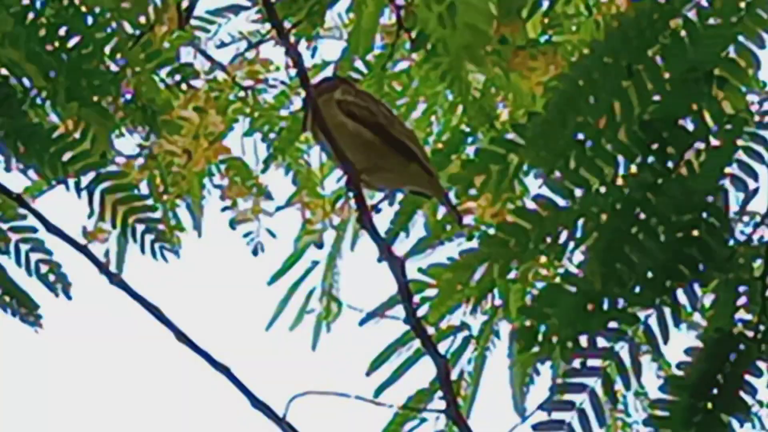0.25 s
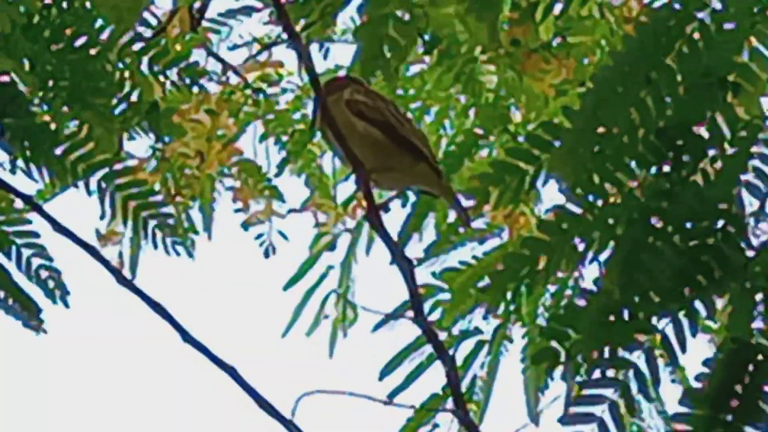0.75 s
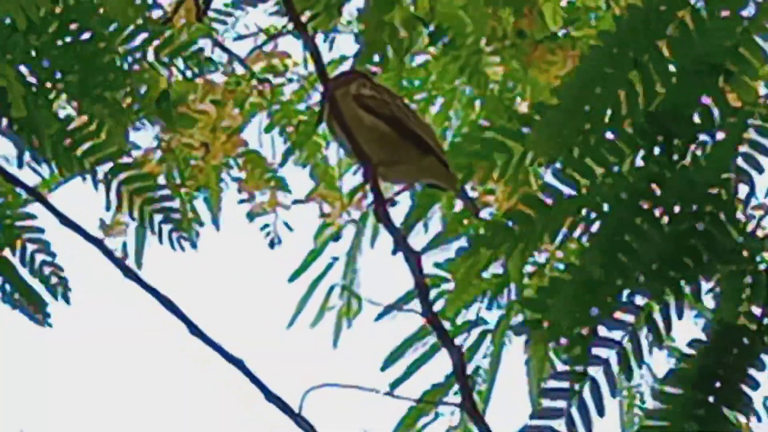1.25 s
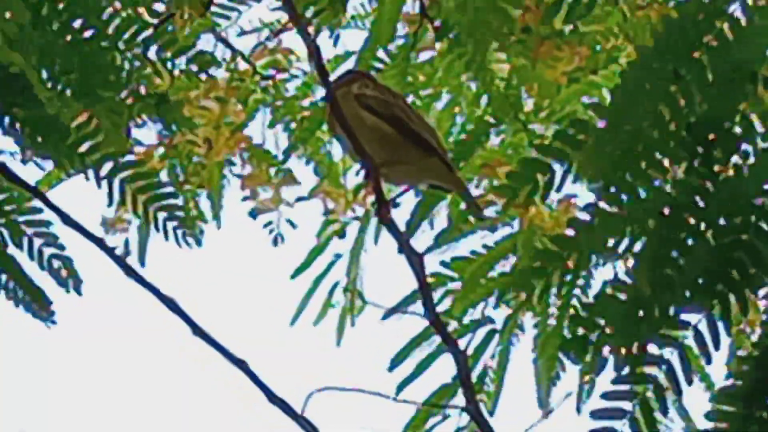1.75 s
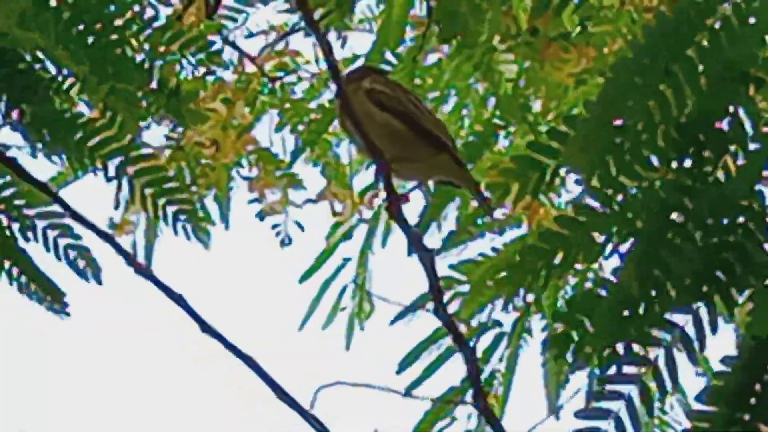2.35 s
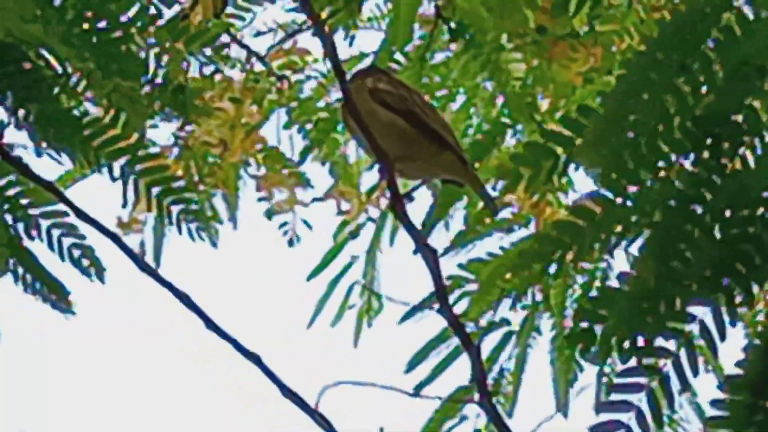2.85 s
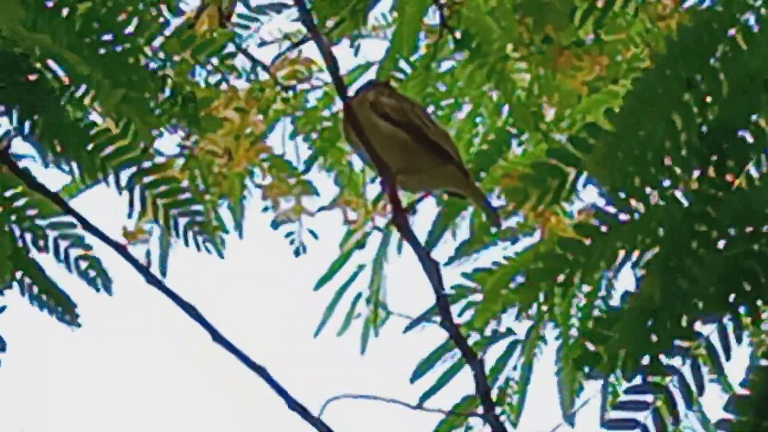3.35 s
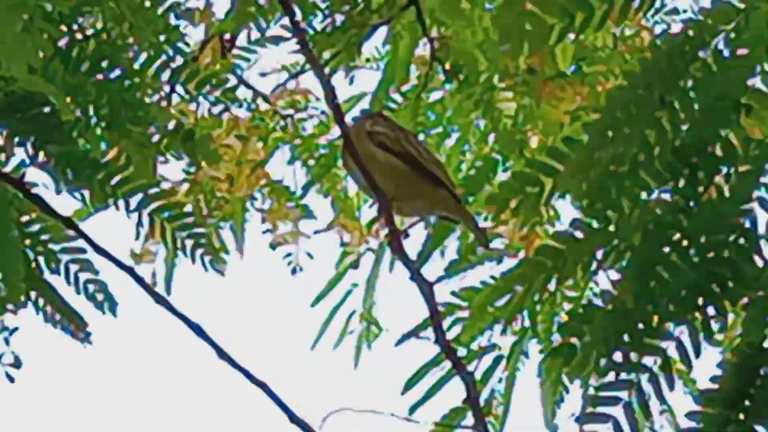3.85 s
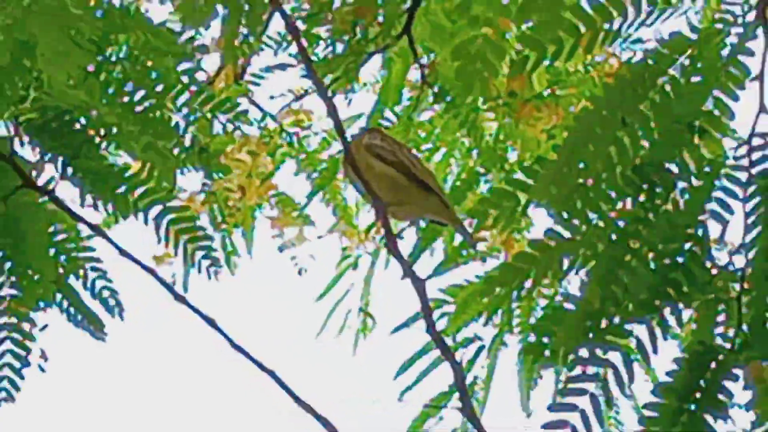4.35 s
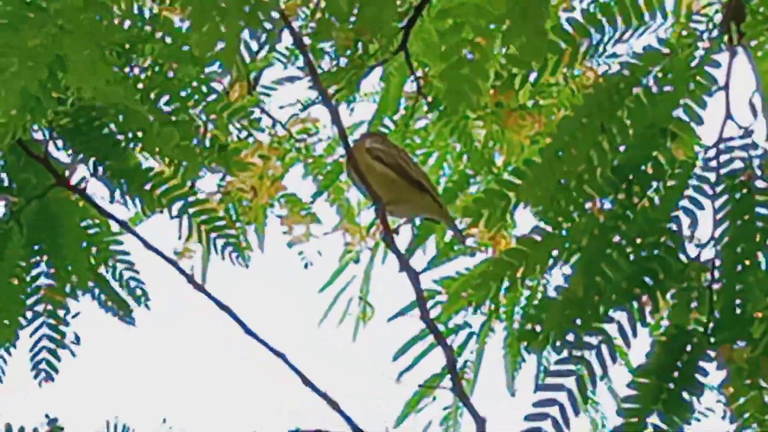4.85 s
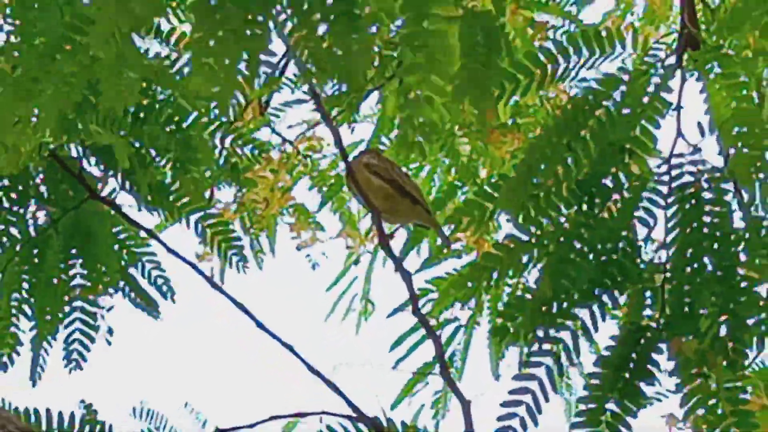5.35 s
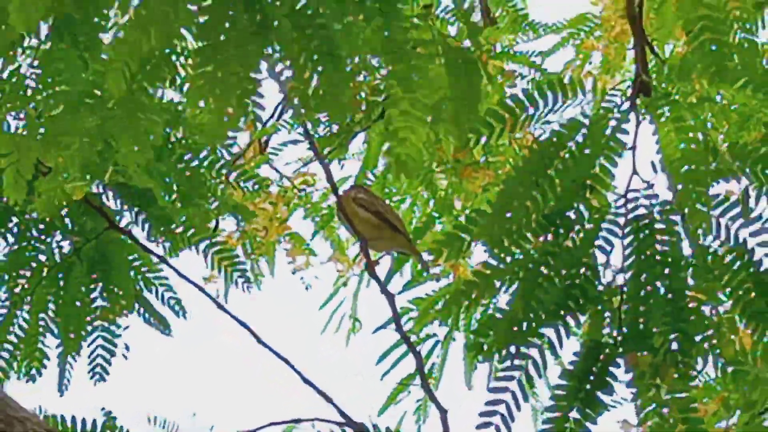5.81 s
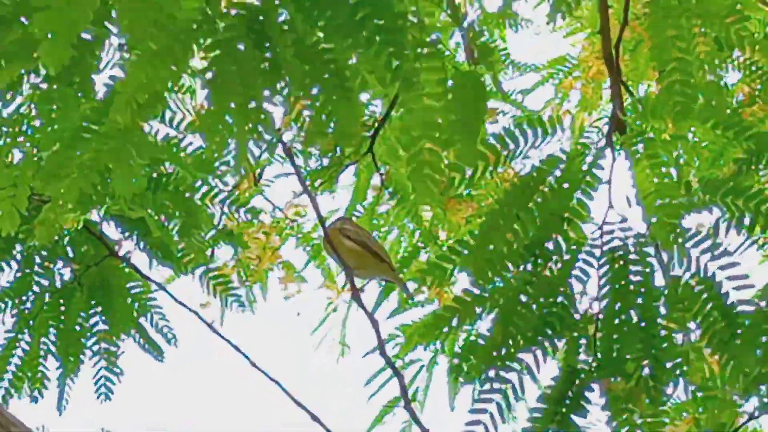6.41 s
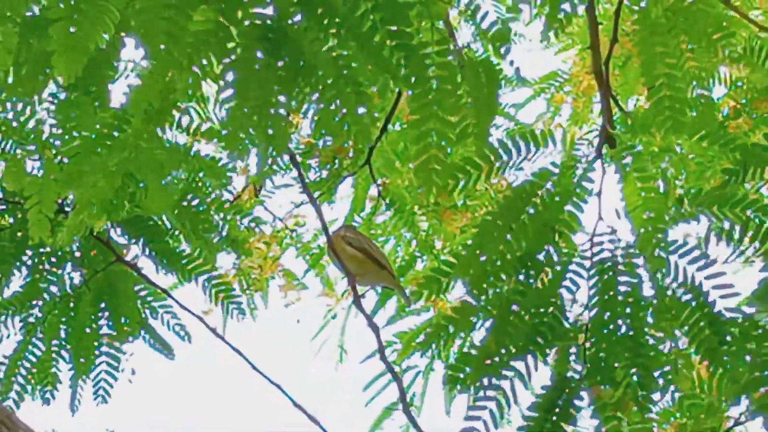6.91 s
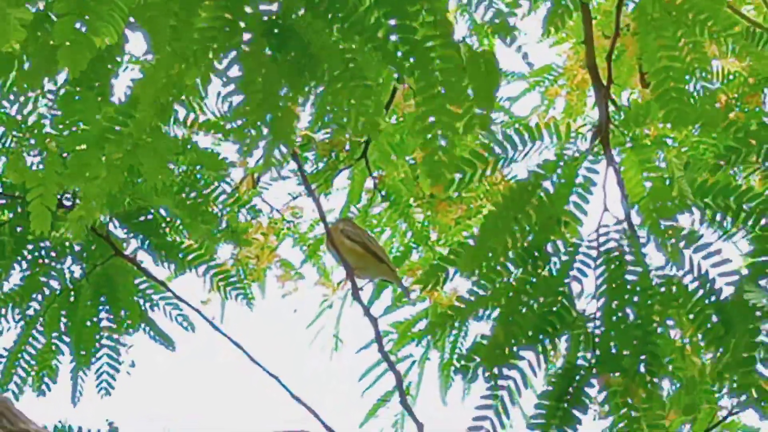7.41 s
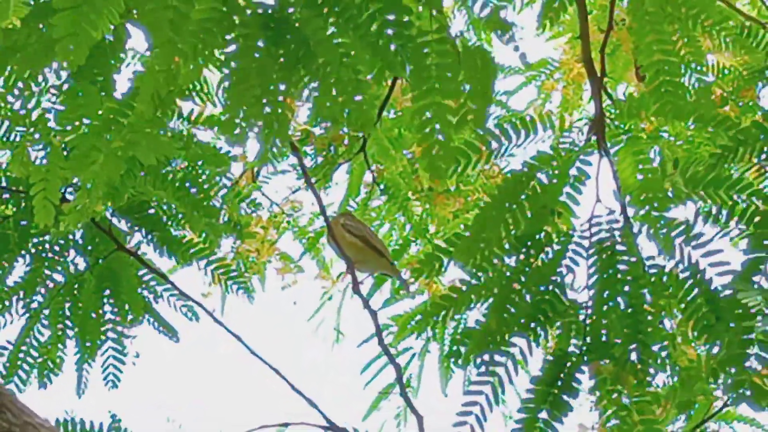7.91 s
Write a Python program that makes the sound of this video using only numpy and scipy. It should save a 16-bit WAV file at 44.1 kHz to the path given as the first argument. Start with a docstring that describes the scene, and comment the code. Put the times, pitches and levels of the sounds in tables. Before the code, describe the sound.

Small birds in a leafy tree give quick, sliding whistles, mostly to the right, with raspy scolding and a blurred flock behind. A cicada buzzes brightly, swelling and then falling away. Calling is busiest early, nearly stops around the middle, and returns as lighter chirps and clearer whistles. Far traffic, soft hiss, a distant dove and small wind bumps surround them. The outdoor stereo microphone is near the birds.

```python
"""A leafy tree: small birds whistle, twitter and scold, mostly to the right, over a cicada and a faint cricket.
Whistles are gliding sines with weak overtones; scolding is throbbing noise; the far flock is many short chirps.
The cicada is a train of clicks, strong and weak in turn, through changing crackles; the cricket is short pips.
Farther off a dove coos, something calls once on a rising pitch and a hollow knock sounds, all built from sines.
Filtered noise makes the traffic rumble, gusts and hiss; the sound drops out for a moment near the start."""
import sys
import numpy as np
from scipy import signal
from scipy.fft import rfft, irfft, next_fast_len
from scipy.io import wavfile
from scipy.ndimage import uniform_filter1d, minimum_filter1d

SR = 44100
rng = np.random.default_rng(int(sys.argv[2]) if len(sys.argv) > 2 else 0)


def wav_record(signal):
    """Record a signal, one row per channel, as 16-bit PCM in the file named by sys.argv[1]."""
    frames = np.transpose(np.atleast_2d(signal))
    bounded = np.clip(frames, -1, 1)
    # unit amplitude maps onto the largest positive 16-bit level
    quanta = np.round(bounded * 32767).astype(np.int16)
    wavfile.write(sys.argv[1], SR, quanta)


N = 360297
LEFT_LAG = 9  # delay of the left port [samples]

# A bare sine: (multiple of the pitch, level [dB])
PURE_TONE = [(1, 0)]


def amp(db):
    """Amplitude factor of a level in dB."""
    return 10 ** (np.asarray(db) / 20)


def rms_one(x):
    """Scale to an overall RMS of 1."""
    return x / np.sqrt(np.mean(x ** 2) + 1e-20)


def in_time(rows):
    """Draw each column of a table as a curve over the whole scene."""
    s, *columns = np.transpose(rows)
    return [np.interp(np.arange(N) / SR, s, column) for column in columns]


def at_hz(points, hz):
    """Read a frequency curve, with straight lines on a log frequency axis."""
    p = np.array(points)
    return np.interp(np.log(hz + 1), np.log(p[:, 0] + 1), p[:, 1])


def colour(x, gain):
    """Filter by a gain per frequency, without shifting phase."""
    size = next_fast_len(N)
    spectrum = rfft(x, size) * gain(np.fft.rfftfreq(size, 1 / SR))
    return irfft(spectrum, size)[..., :N]


def drift(rate, size=N):
    """Slow random wander of RMS 1: noise through two equal low-pass poles at rate [Hz]."""
    r, lead = np.exp(-2 * np.pi * rate / SR), int(SR / rate)
    noise = rng.standard_normal(size + lead)
    return rms_one(signal.lfilter([1], [1, -2 * r, r * r], noise)[lead:])


def place(x, pan_db):
    """Place a source: the left port hears it later, at pan_db against the right."""
    return np.array([np.roll(x, LEFT_LAG) * amp(pan_db), x])


def tail(t60, start_s):
    """A dying burst of noise for each side, energy 1."""
    t = np.arange(int(.5 * SR)) / SR
    burst = rng.standard_normal((2, len(t))) * amp(-60 * t / t60) * (t > start_s)
    return burst / np.sqrt(np.sum(burst ** 2, axis=1, keepdims=True))


def add_note(out, rows, partials, pan_db, waver=.005, flutter_db=2.6, edge_s=.003):
    """One sung note: partials on a gliding pitch, unsteady in pitch and level, with soft ends."""
    s, hz, level_db = np.transpose(rows)
    i = np.arange(round(s[0] * SR), min(round(s[-1] * SR), N))
    pitch = np.interp(i / SR, s, hz) * (1 + waver * drift(190, len(i)))
    phase = 2 * np.pi * (np.cumsum(pitch) / SR + rng.random())
    # partials too near the top of the band stay silent
    tone = sum(amp(db) * np.sin(k * phase) * (k * pitch < .45 * SR) for k, db in partials)
    ends = np.clip(np.minimum(i - i[0], i[-1] - i) / (edge_s * SR), 0, 1)
    level = np.interp(i / SR, s, level_db) + flutter_db * drift(96, len(i))
    gain = np.sqrt(2) * amp(level)  # a sine at 0 dB has RMS 1
    out[:, i] += place(tone * gain * ends, pan_db)


def add_whistle(out, rows, pan_db, twelfth_db):
    """A slightly hoarse sine with weak overtones; the octave is weaker in higher notes."""
    mean_khz = np.mean(rows, axis=0)[1] / 1000
    octave_db = -22.5 - 2.5 * (mean_khz - 3.5)
    partials = [(1, 0), (2, octave_db), (3, twelfth_db)]
    add_note(out, rows, partials, pan_db, waver=0.0055, flutter_db=3)


def near_whistles():
    """Each near whistle glides along a bowed line, swells to its loudest moment and fades."""
    # Whistled notes: (time [s], length [s], first pitch [Hz], last pitch [Hz],
    # bow of the glide at half length [Hz], loudest moment [share of length],
    # level there before flutter [dB], left minus right before crown and shade [dB])
    notes = [(0.0, 0.059, 3350, 2800, -130, .05, -21.5, -14),
             (0.176, 0.044, 3080, 2390, 70, .1, -28.5, -25), (0.214, .09, 3540, 2840, 52, 0.13, -22, -5),
             (0.635, .11, 3667, 2790, 144, 0.108, -20, -14),
             (1.08, 0.15, 3805, 3230, 155.5, 0.49, -18.5, -13),
             (1.258, .13, 4300, 2996, -100, 0.3, -13.5, -17),
             (1.297, 0.028, 5900, 8200, 297, .1, -19.5, -17), (1.36, .02, 8000, 11000, 0, .5, -38, -17),
             (1.732, .015, 2990, 3500, 0, 0.57, -21.5, -18), (1.923, 0.051, 3890, 3540, -2, 0.4, -20, -16),
             (1.332, 0.028, 7940, 5697, -800, 0.7, -16, -14),
             (1.372, 0.039, 5580, 3546, 0, 0.95, -18.5, -19),
             (1.449, 0.21, 3654, 3266, -120, 0.13, -15.5, -11),
             (1.529, 0.062, 4610, 4250, 116, 0.7, -17.5, -18),
             (1.595, 0.15, 4230, 2877, -280, 0.25, -11, -17),
             (1.75, 0.07, 4132, 3686, 79, 0.044, -11, -20.5), (1.79, .055, 5730, 5020, 77, 0.32, -22, -16),
             (1.844, 0.19, 4840, 2790, -400, 0.36, -11.5, -15),
             (2.04, 0.033, 2730, 2130, 100, .05, -40, -19), (2.163, .04, 7160, 6580, 168.5, .1, -25, -21),
             (2.181, 0.21, 4546, 2880, -330, 0.31, -10, -16),
             (2.2, 0.16, 5650, 3552, -400, 0.66, -13, -8.5), (2.37, 0.057, 3250, 2805, 4, 0.43, -22.5, -22),
             (2.506, 0.079, 4210, 4210, -300, 0.42, -13.5, -20),
             (2.575, 0.032, 4040, 2870, 150, 0.22, -13.5, -24),
             (2.808, 0.2, 4470, 2930, -19, 0.43, -12.5, -16), (3.122, .05, 3660, 3070, 0, 0.47, -18.5, -11),
             (3.28, 0.093, 3876, 3000, 33, .05, -12.5, -16),
             (3.531, 0.11, 3533, 2840, -38, 0.044, -19, -11.5),
             (3.622, .03, 7500, 7400, -100, .6, -33, -11), (3.634, 0.03, 3620, 3980, -2, 0.6, -14.5, -13),
             (3.668, 0.029, 3657, 2915, 283, 0.25, -17, -10),
             (3.697, 0.047, 3050, 2960, -5, 0.57, -32.5, -13), (3.693, 0.031, 6770, 6600, 0, .2, -25, -25),
             (3.7, 0.04, 6130, 5993, -2.5, 0.83, -17, -28),
             (3.736, .175, 4313, 2776, -64, 0.39, -14.5, -9.5), (3.974, 0.033, 2810, 2520, 0, .1, -31, -18),
             (4.04, 0.039, 2880, 2330, 58.5, .2, -31.5, -19),
             (4.957, 0.17, 6060, 5180, 593, 0.46, -17, -16),
             (4.962, 0.066, 4080, 2913, 160, .05, -24.5, -11), (5.008, .05, 8300, 4400, -180, .5, -31, -12),
             (5.066, 0.016, 3140, 2990, 250, 0.3, -34.5, -16),
             (5.142, 0.031, 3300, 2810, 202, 0.45, -29.5, -16),
             (5.188, 0.034, 3230, 3500, 50, .5, -32.5, -10), (5.193, 0.023, 7400, 7560, 800, .3, -39, -7),
             (5.203, .05, 5780, 4005, 130, .5, -31, -10), (5.23, 0.02, 3090, 2700, 0, .1, -38, 4.5),
             (5.255, 0.11, 8000, 8400, 550, 0.93, -37, -15), (5.344, 0.045, 8600, 7780, 600, 1, -33.5, -11),
             (5.373, 0.049, 7770, 8100, 3, .1, -32, -7), (5.293, 0.037, 6460, 6960, 850, 0.43, -29.5, -11),
             (5.325, .18, 6890, 4920, 1150, 0.74, -28, -15), (5.434, 0.16, 4650, 2890, -170, .5, -30, -6.5),
             (5.27, 0.013, 5890, 4570, 0, .5, -28, -12), (5.328, 0.017, 4750, 5140, 0, .5, -28, -10),
             (5.429, .04, 5900, 6030, 0, .2, -32, -14), (5.57, .02, 5400, 4770, 0, .4, -35, -12),
             (5.687, 0.093, 6400, 8700, 700, 0.33, -48, -6), (5.881, .02, 5100, 4170, -2, .7, -27, -12),
             (5.967, .012, 5020, 4840, 0, .5, -30, -12), (5.49, 0.015, 2920, 2800, 0, .3, -39, -17),
             (5.527, 0.024, 3220, 2232, 0, .1, -28, -19), (5.62, 0.037, 2898, 2540, 188, 0.55, -43, -20),
             (5.604, 0.072, 5920, 5890, -110, .05, -28, -15),
             (5.68, 0.14, 4300, 4180, -110, 0.73, -32.5, -4), (5.741, .015, 4834, 5100, 0, .7, -27, -12),
             (5.758, 0.023, 2980, 2710, 450, 0.95, -28.5, -14), (5.8, .03, 7590, 7530, 240, .1, -38, -15),
             (5.888, 0.019, 2890, 2710, 355, .4, -29.5, -16), (5.958, .025, 6980, 7000, 0, .3, -38, -15),
             (6.026, 0.0143, 8060, 6500, 0, .7, -41, -13), (6.04, .015, 3062, 2810, 0, 0.33, -34, -16),
             (6.134, 0.066, 4840, 4340, 250, 0.22, -27.5, -21), (6.165, .015, 3040, 2720, 0, .3, -33, -18),
             (6.336, .027, 6200, 3250, -500, 0.59, -21, -13),
             (6.35, 0.032, 4700, 4280, -77, 0.76, -20.5, -12), (6.365, .012, 3300, 4400, 5, .5, -21, -12),
             (6.377, 0.0084, 4550, 2700, 0, .3, -23, -21), (6.38, .02, 6080, 4800, 200, .3, -25, -14),
             (6.399, 0.065, 4740, 4660, -27, .1, -24.5, -3), (6.438, 0.013, 3500, 1930, 0, .1, -36, -19),
             (6.46, .025, 5000, 5260, 0, .2, -26, -8), (6.475, 0.019, 6190, 6060, 0, .8, -21, -17),
             (6.5, 0.075, 4830, 3570, -200, 0.56, -29, -2), (6.566, 0.064, 3670, 2874, 32, 0.67, -23, -10),
             (6.61, 0.026, 7060, 4400, 1100, .4, -23, -5), (6.689, .033, 7030, 4270, 1197, 0.37, -24, -12),
             (6.729, 0.053, 4170, 4500, 1500, 0.13, -35, -5), (6.546, 0.056, 4050, 3500, 0, 0.54, -30, -5),
             (6.806, 0.019, 6650, 6570, 0, .3, -31, -12), (6.832, 0.043, 4400, 3820, -6, .5, -26, -1),
             (7.13, 0.09, 6550, 5660, 145, 0.72, -30.5, -18),
             (6.765, 0.059, 4600, 4150, -64, 0.28, -28.5, -4), (6.779, .015, 3480, 3330, 0, .7, -30, -7),
             (6.939, 0.14, 4220, 2734, -3, 0.55, -20.5, -11),
             (6.983, 0.12, 4420, 3280, -160, 0.47, -17, -11), (7.01, 0.049, 5700, 5630, -4, .9, -30, -18),
             (7.037, 0.24, 6300, 5000, 499, .5, -28, -18), (7.097, 0.012, 3850, 3840, 2, .1, -13.5, -12),
             (7.149, 0.11, 3860, 2940, 8, 0.42, -20.5, -8.5),
             (7.176, 0.06, 2717, 1970, -230, 0.2, -39, -19), (7.23, 0.023, 4030, 3790, 0, .1, -27, -14),
             (7.5, 0.11, 4040, 2956, -420, .05, -12.5, -8), (7.63, 0.12, 2770, 2055, -270, .05, -33, -15),
             (7.537, 0.026, 2790, 2230, 0, .9, -34, -27), (7.842, 0.013, 4030, 3050, 0, .1, -18, -12),
             (7.856, .015, 3880, 2800, 0, 0.17, -35, -14)]
    # a .1 s note gains swell_db over a whole length before its summit and loses fade_db over one after
    swell_db, fade_db = 18, 20.5
    longer_power = 0.52  # longer notes swing more in level
    pointed_power = 0.93  # under 1: a sharp summit with long shoulders
    step_share = 0.0348  # long notes move fastest mid-glide [share of the pitch change]
    out, u = np.zeros((2, N)), np.linspace(0, 1, 17)
    for s, long, first_hz, last_hz, bow_hz, peak, db, pan_db in notes:
        step = step_share * min(10 * long, 1) * np.sin(2 * np.pi * u)
        hz = first_hz + (last_hz - first_hz) * (u - step) + bow_hz * np.sin(np.pi * u)
        before = np.maximum(peak - u, 0) ** pointed_power
        after = np.maximum(u - peak, 0) ** pointed_power
        loss_db = (swell_db * before + fade_db * after) * (10 * long) ** longer_power
        rows = np.transpose([max(s, 0) + long * u, hz, db - loss_db])
        add_whistle(out, rows, pan_db, twelfth_db=-38)
    return out


def far_flock(count=900):
    """Many short, hoarse chirps, most of them falling, at random times, pitches and places."""
    # Level of the whole flock before the crown: (time [s], level [dB])
    flock_level = [(0, -30.5), (.5, -28.5), (1.6, -26), (2.5, -27.5), (3.9, -37), (4.5, -58), (5.1, -40),
                   (6, -34), (6.5, -45.5), (7.5, -33), (8.17, -28.5)]
    out = np.zeros((2, N))
    for when, high, long, loud, side, fall in rng.random((count, 6)):
        start, hz, db = when * (N / SR - .02), 3100 * 2.2 ** high, 7 * loud
        end = start + .01 + .04 * long
        rows = [(start, hz, db), (end, hz * (1.05 - .35 * fall), db - 4)]
        add_note(out, rows, PURE_TONE, -14 * side, waver=0.021, flutter_db=2.5)
    return amp(in_time(flock_level)[0]) * rms_one(out)


def cicada(strong_db=5, hiss=1.0, count=5):
    """Two drums buckle in turn; the ribs' crackle changes slowly, so fine lines come and go in the buzz."""
    # Swell of the buzz, before a fixed lift and a wander: (time [s], level [dB])
    buzz_level = [(0.0, -27.5), (.1, -34.5), (.13, -24), (.68, -24), (.75, -29.5), (1.0, -26.5),
                  (1.23, -23), (1.39, -26), (1.72, -31.5), (1.84, -26), (1.95, -32.5), (2.16, -25.5),
                  (2.23, -26.5), (2.33, -22), (2.52, -19), (3.23, -18), (3.5, -23.5), (3.66, -27),
                  (3.73, -39), (3.82, -30.5), (4.07, -33), (4.16, -23), (4.69, -20), (4.96, -21),
                  (5.01, -47), (5.23, -35), (5.44, -44), (5.52, -38.5), (5.66, -47.5), (5.96, -34.5),
                  (6.3, -33), (6.37, -30.5), (6.55, -31.5), (6.76, -49.5), (6.83, -28.5), (6.96, -28.5),
                  (7.03, -36), (7.1, -33.5), (7.26, -39), (7.35, -30.5), (8.17, -25.5)]
    # Colour and place, before the shade: (time [s], treble against body [dB], left minus right [dB])
    treble_and_pan = [(0.0, -17.5, -6.5), (.7, -16.5, -7), (1.5, -17, -8.5), (2.1, -15, -10.5),
                      (2.5, -20, -12.5), (3.4, -18.5, -11.5), (3.7, -18, -9.5), (4.0, -22, -9),
                      (4.2, -18.5, -10.5), (4.9, -17, -13), (5.1, -22, -9), (5.8, -20, -7),
                      (6.5, -17.5, -7.5), (7.2, -20, -8), (7.35, -15, -6.5), (8.17, -17.5, -9)]
    # Resonance of the belly, as relative gain: (frequency [Hz], gain [dB])
    belly = [(1500, -51), (2100, -31), (2700, -25), (3200, -21), (3550, -7), (4000, -2), (4400, -1),
             (4950, -8.5), (5300, -4.5), (5650, -1.5), (6000, -7), (6500, -14), (8400, -24.5),
             (9650, -34.5), (10600, -31), (13900, -31.5), (15800, -29.5)]
    # High ring of the first buzz: (time [s], level [dB])
    shrill_level = [(.1, -49), (.2, -36.5), (.7, -37.5), (.74, -64)]
    clicks_per_s, split_hz = 472, 9000  # mean click rate; border of body and treble
    shrill_hz, shrill_width_hz = 11400, 870
    (buzz_db,), (treble_db, pan_db) = in_time(buzz_level), in_time(treble_and_pan)

    beat = np.cumsum(clicks_per_s * (1 + .009 * drift(8))) / SR
    at = np.flatnonzero(np.diff(np.floor(beat)))
    strong_weak_db = strong_db * (-1.) ** np.arange(len(at))
    clicks = np.zeros(N)
    clicks[at] = amp(strong_weak_db + 1.5 * rng.standard_normal(len(at)))

    turn = np.cumsum(np.abs(drift(3))) * 12 / SR  # walk through the crackle patterns
    crackle = 0
    for k in range(count):
        share = np.sqrt(np.clip(1 - np.abs((turn - k) % count - 1), 0, 1))
        crackle = crackle + signal.fftconvolve((clicks * share)[None], tail(.03, 0), axes=1)[:, :N]
    drive = rms_one(crackle) + hiss * rng.standard_normal((2, N))
    drive[0] = .45 * np.roll(drive[1], LEFT_LAG) + .9 * drive[0]  # the left hears mostly scatter

    body = rms_one(colour(drive, lambda hz: amp(at_hz(belly, hz)) * (hz < split_hz)))
    treble = rms_one(colour(drive, lambda hz: amp(at_hz(belly, hz)) * (hz >= split_hz)))
    shrill = rms_one(colour(drive, lambda hz: 1 / (1 + (2 * (hz - shrill_hz) / shrill_width_hz) ** 2)))
    swell = amp(buzz_db + 4.5 + 0.74 * drift(6.5))
    buzz = swell * (body + amp(treble_db) * treble) + amp(in_time(shrill_level)[0]) * shrill
    return buzz * np.array([amp(pan_db), np.ones(N)])


def traffic_rumble():
    """Far traffic: low noise whose left and right agree by a set amount at each frequency."""
    # Rumble spectrum, as relative gain: (frequency [Hz], gain [dB])
    rumble_colour = [(12, -3), (20, 2.5), (66, -10), (151, -16), (309, -18.5), (445, -18), (999, -26.5),
                     (1360, -24), (2000, -23), (2600, -14), (4400, -120)]
    # Left-right likeness of the rumble: (frequency [Hz], correlation [-1 to 1])
    likeness = [(60, 0.81), (180, 0.87), (550, 0.33), (1650, -0.58), (4970, 0.053), (15000, -0.05)]
    mid, side = rng.standard_normal((2, N))

    def alike(hz):
        """Left-right correlation at each frequency."""
        return np.clip(at_hz(likeness, hz), -1, 1)

    mid = colour(mid, lambda hz: amp(at_hz(rumble_colour, hz)) * np.sqrt(1 + alike(hz)))
    side = colour(side, lambda hz: amp(at_hz(rumble_colour, hz)) * np.sqrt(1 - alike(hz)))
    return amp(-49) * rms_one(np.array([mid + side, mid - side]))


def wind_gusts():
    """Wind on the microphone: bursts of very low noise, independent at each port."""
    # Gust peaks, before flutter and balance: (time [s], level [dB])
    gusts = [(.13, -42), (.32, -45), (.59, -49), (.95, -53), (2.39, -57), (2.8, -52), (3.16, -53.5),
             (4.94, -52), (6.03, -58), (7.36, -51), (7.51, -45), (7.7, -51), (7.92, -52)]
    gust_s, breeze_db = 0.062, -59.5  # half width of a gust; floor before flutter and balance
    band = signal.butter(2, [18, 60], "band", fs=SR, output="sos")
    noise = rms_one(signal.sosfilt(band, rng.standard_normal((2, N))))
    t = np.arange(N) / SR
    wind = amp(breeze_db) + sum(amp(db) * np.exp(-((t - s) / gust_s) ** 2) for s, db in gusts)
    balance = amp([[2], [-2]])  # stronger on the left
    return wind * amp(1.3 * drift(23)) * noise * balance


def soft_hiss():
    """Steady hiss of leaves and microphone: coloured noise, independent on each side."""
    # Hiss spectrum, as relative gain: (frequency [Hz], gain [dB])
    hiss_colour = [(1000, -9.5), (3000, 14.5), (11000, -2.5), (12500, -18), (16000, -4)]
    noise = rng.standard_normal((2, N))
    return amp(-47) * rms_one(colour(noise, lambda hz: amp(at_hz(hiss_colour, hz))))


def hollow_knock():
    """One hollow knock: three decaying sine modes with a softened onset."""
    # Modes: (frequency [Hz], level before decay and onset [dB], 60 dB decay time [s])
    modes = [(460, -37.5, 0.11), (918, -37.5, 0.075), (1027, -42, 0.056)]
    t = np.maximum(np.arange(N) / SR - .718, 0)  # time since the knock [s]
    onset = np.clip(t / 0.009, 0, 1)
    return onset * sum(amp(db - 60 * t / t60) * np.sin(2 * np.pi * hz * t) for hz, db, t60 in modes)


def scolding(pan_db=-12):
    """Hoarse bursts of near birds: throbbing noise from a strained throat."""
    # Bursts, before throb, pan and crown: (time [s], length [s], level [dB])
    bursts = [(0.766, 0.074, -42), (0.896, 0.041, -56), (1.097, 0.17, -38), (1.304, 0.075, -39),
              (1.492, 0.1, -32.5), (1.764, 0.049, -40), (1.832, 0.026, -26), (2.02, 0.11, -36.5),
              (2.163, 0.06, -28), (2.8, 0.048, -34), (3.72, .04, -33.5), (4.02, .03, -44),
              (5.215, 0.069, -45), (5.526, 0.023, -47), (5.61, 0.031, -52), (5.934, 0.023, -40),
              (6.106, 0.027, -56), (6.266, 0.024, -52), (6.337, .12, -43.5), (6.47, 0.083, -44),
              (6.8, 0.29, -41.5), (7.5, 0.027, -36), (7.836, 0.027, -52), (8.104, 0.029, -38)]
    # Rasp spectrum, as relative gain: (frequency [Hz], gain [dB])
    rasp_colour = [(3000, -39), (5500, -13), (7200, 7), (9000, 2.5), (11000, 0.5), (12000, -37),
                   (16000, -26.5)]
    rise_s, fall_s = 0.029, 0.0088
    t, gate = np.arange(N) / SR, np.zeros(N)
    for s, long, db in bursts:
        corners = [s - rise_s / 2, s + rise_s / 2, s + long, s + long + fall_s]
        gate += amp(db) * np.interp(t, corners, [0, 1, 1, 0])
    noise = rng.standard_normal((2, N))
    rasp = rms_one(colour(noise, lambda hz: amp(at_hz(rasp_colour, hz))))
    throb = amp(3.0 * drift(110))
    return rasp * gate * throb * amp([[pan_db], [0]])


def cricket():
    """A far cricket: faint fading pips around one pitch."""
    # Pips: (time [s], starting level before flutter and soft edge [dB])
    pips = [(.94, -29.5), (1.58, -45), (2.42, -55.5), (2.8, -45), (3.15, -49), (3.83, -50), (4.19, -54),
            (4.8, -62), (5.71, -41), (6.3, -52), (7.45, -39)]
    pip_hz, pip_s = 2235, 0.13
    out = np.zeros((2, N))
    for s, db in pips:
        rows = [(s, pip_hz, db), (s + pip_s, pip_hz, db - 12)]
        add_note(out, rows, PURE_TONE, -1.5, waver=0.006, edge_s=0.0087)
    return out


def dove():
    """A far dove: low, nearly pure coos that swell quickly and fade."""
    # Coos: (time [s], length [s], pitch [Hz], level at the loudest moment before flutter [dB])
    coos = [(1.474, .12, 408, -53), (4.023, 0.12, 389, -55.5), (4.283, 0.087, 381, -55),
            (4.696, 0.14, 405, -50), (4.891, 0.066, 402, -56), (5.185, 0.039, 435, -55),
            (5.448, 0.11, 396, -54), (5.676, 0.096, 385, -56.5), (5.79, 0.12, 403, -52),
            (7.025, 0.13, 410, -54.5), (8.095, 0.089, 396, -54.5)]
    peak, swell_db, fade_db = 0.12, 7, 4.5  # loudest at this share of the length
    out = np.zeros((2, N))
    for s, long, hz, db in coos:
        rows = [(s, hz, db - swell_db), (s + peak * long, hz, db), (s + long, hz, db - fade_db)]
        add_note(out, rows, PURE_TONE, 0, waver=.003, flutter_db=3, edge_s=0.0054)
    return out


def rising_call():
    """One far call: four harmonics, the second strongest, on a rising pitch."""
    # Path of the call, before flutter: (time [s], pitch [Hz], level [dB])
    path = [(5.14, 368.6, -66), (5.299, 388.5, -58), (5.45, 404.5, -57), (5.52, 422.2, -64)]
    # Partials: (multiple of the pitch, level against the path [dB])
    call_partials = [(1, -6), (2, 0), (3, -7), (4, -3)]
    out = np.zeros((2, N))
    add_note(out, path, call_partials, -2, waver=0.0034, flutter_db=1.5)
    return out


def reedy_note():
    """One long, nearly level bird note, reedy from its strong third partial."""
    # Path of the note, before flutter: (time [s], pitch [Hz], level [dB])
    reedy_path = [(7.291, 5160, -20.5), (7.39, 4960, -19.5), (7.45, 4970, -21), (7.49, 4890, -27)]
    out = np.zeros((2, N))
    add_whistle(out, reedy_path, pan_db=-9.5, twelfth_db=-14)
    return out


def crown(x):
    """Leaves and branches return a short diffuse tail, another one to each side."""
    return x + amp(-5) * signal.fftconvolve(x, tail(0.14, 0.00423), axes=1)[:, :N]


def shade_left(x):
    """Colour the shaded left port and leave the right as it is."""
    # Colour of the shade: (frequency [Hz], gain [dB])
    shade = [(1000, 3), (2300, 10.5), (4000, -4), (5500, -4.5), (7000, -7.5), (8500, 6), (10500, 1),
             (14000, -5.5)]
    return np.array([colour(x[0], lambda hz: amp(at_hz(shade, hz))), x[1]])


def scene():
    """Birds scattered by the crown and the cicada, shaded on the left, with the far sounds and air."""
    birds = near_whistles() + far_flock() + scolding() + reedy_note()
    tree = shade_left(crown(birds) + cicada())
    air = traffic_rumble() + wind_gusts() + soft_hiss()
    far = hollow_knock() + cricket() + dove() + rising_call()
    return tree + air + far


def record(dry):
    """A short dropout and a quick limiter that holds peaks under full scale, then the top is cut."""
    # Silence: (start [s], end [s])
    gap = (0.079, 0.1054)
    limit, limit_s, cutoff_hz = .99, .004, 15950
    t = np.arange(N) / SR
    closing, opening = (gap[0] - t) / 0.0018, (t - gap[1]) / 0.0081
    dropout = np.clip(np.maximum(closing, opening), 0, 1)
    size = int(limit_s * SR)
    room = np.minimum(limit / (np.abs(dry).max(axis=0) + 1e-9), 1)
    gain = uniform_filter1d(minimum_filter1d(room, size=size), size=size)
    top_cut = signal.ellip(14, .5, 95, cutoff_hz, fs=SR, output="sos")
    return signal.sosfilt(top_cut, dry * dropout * gain)


dry = scene()
out = record(dry)
wav_record(out)
```